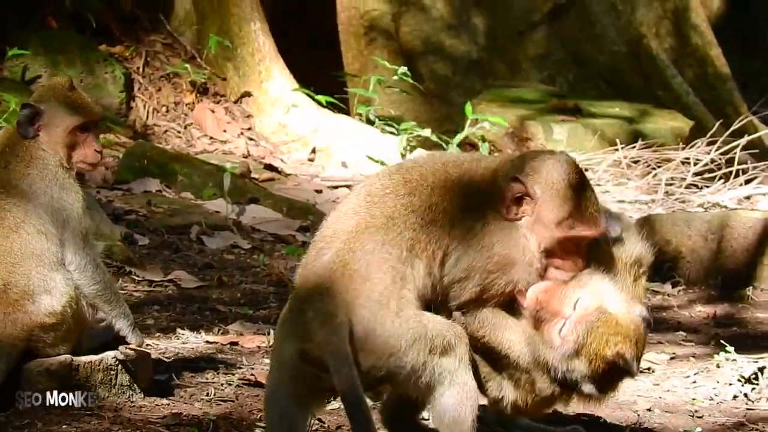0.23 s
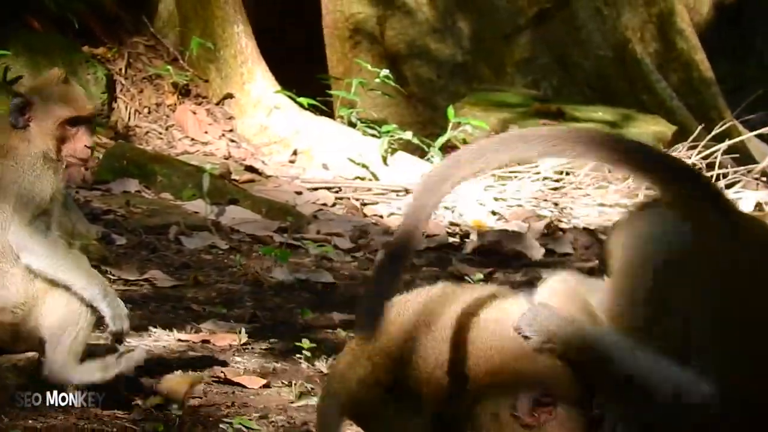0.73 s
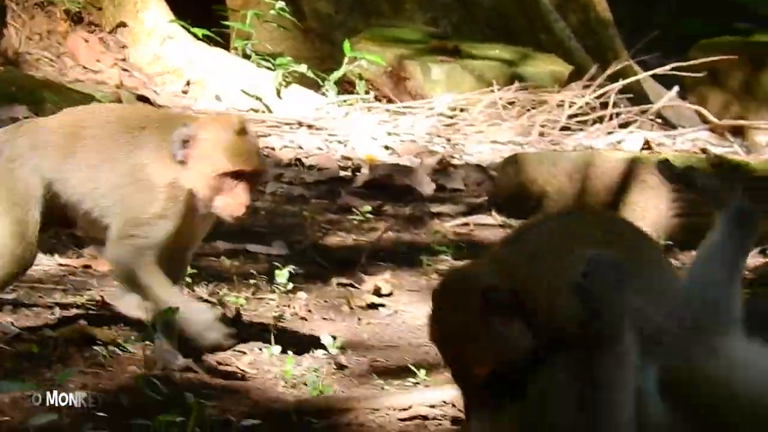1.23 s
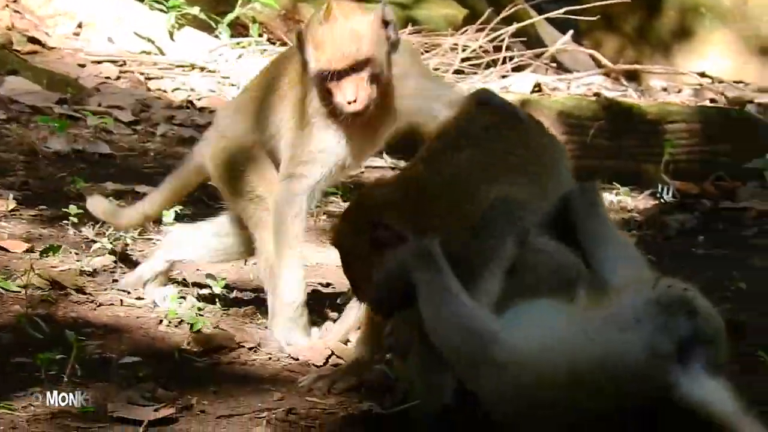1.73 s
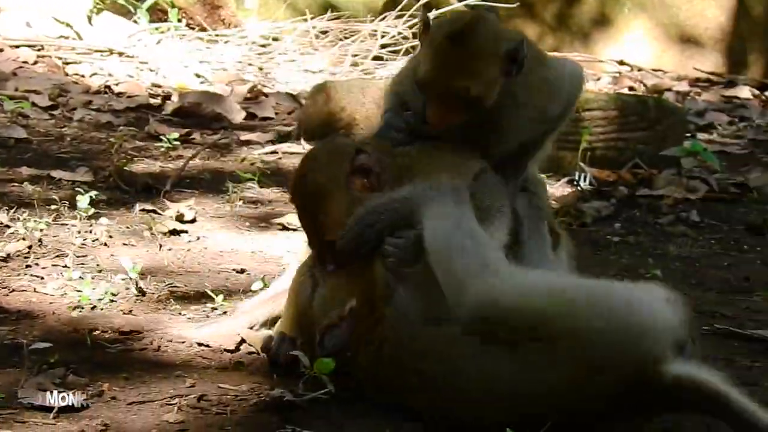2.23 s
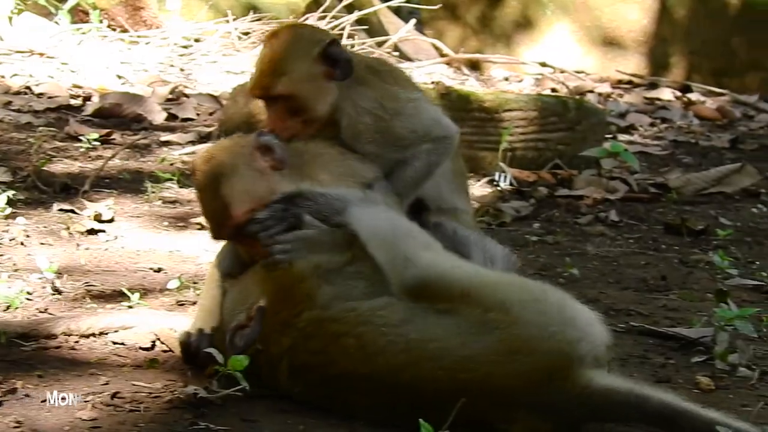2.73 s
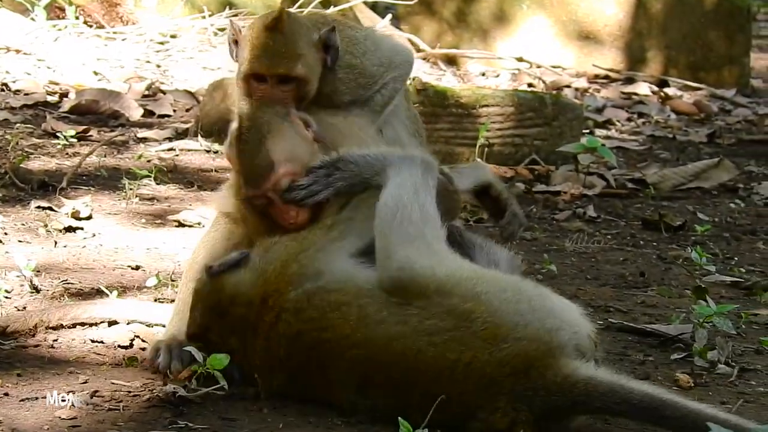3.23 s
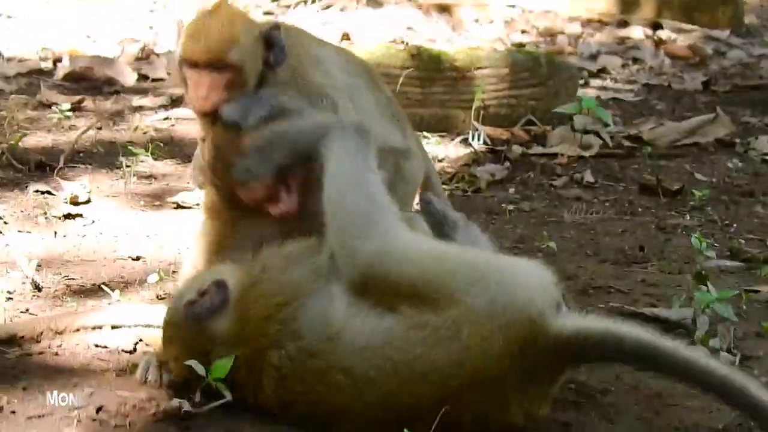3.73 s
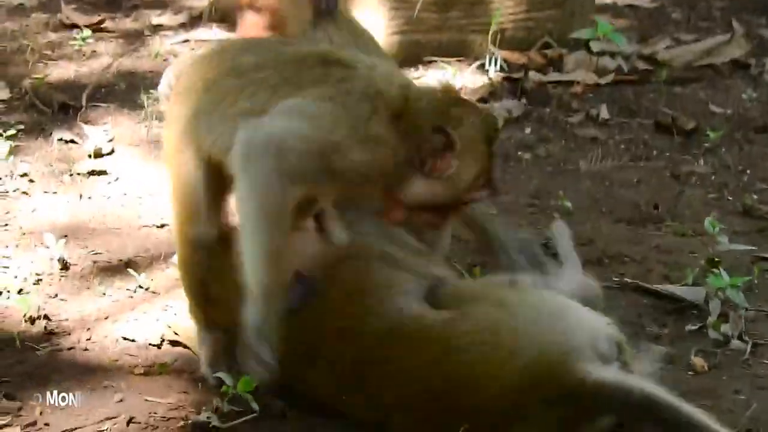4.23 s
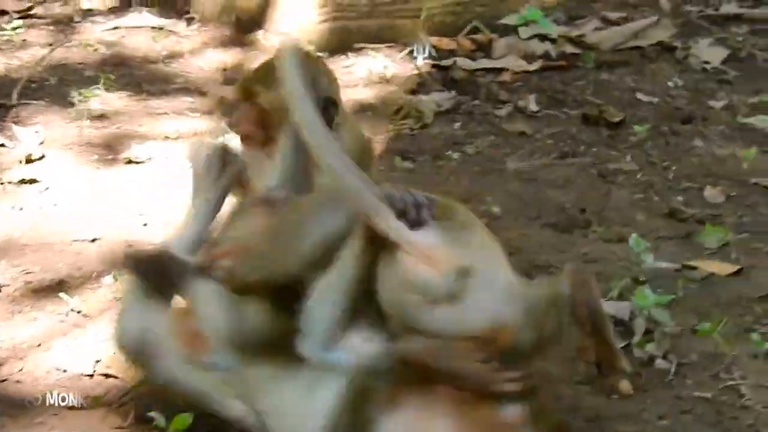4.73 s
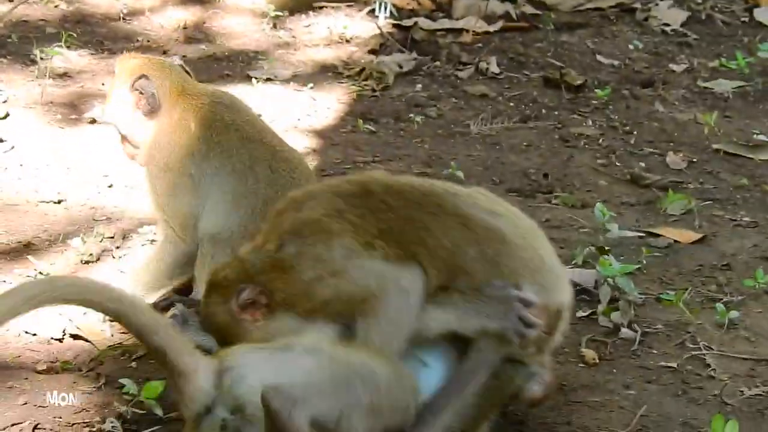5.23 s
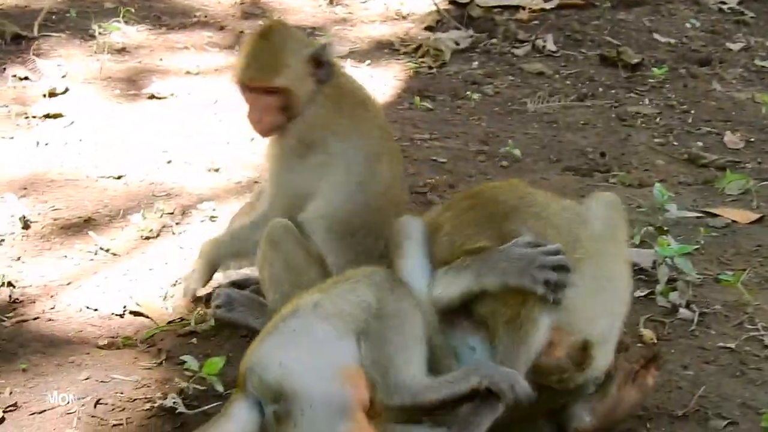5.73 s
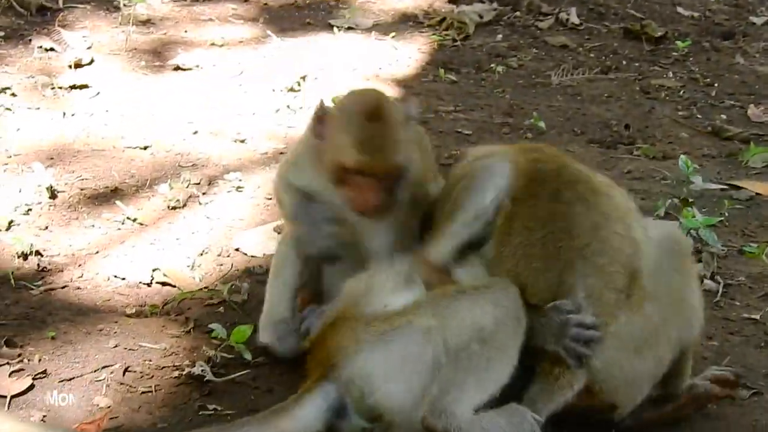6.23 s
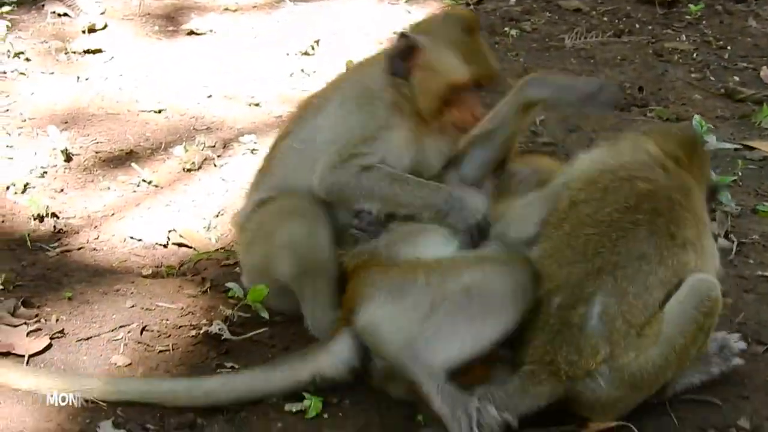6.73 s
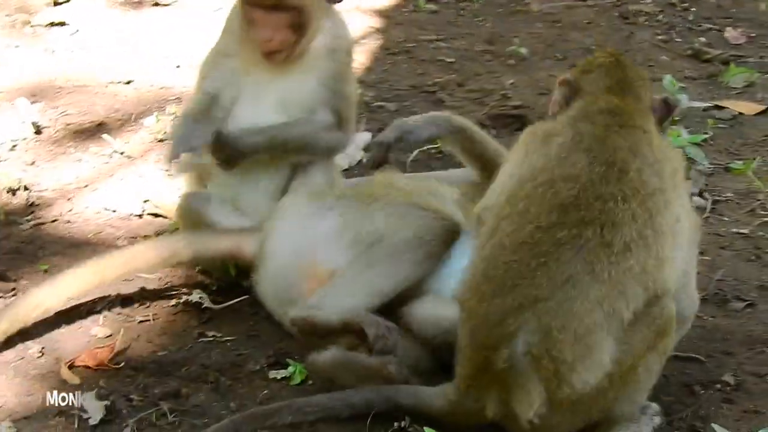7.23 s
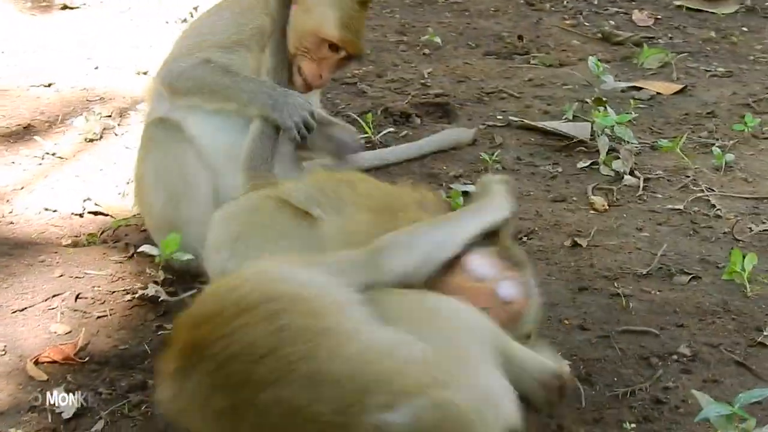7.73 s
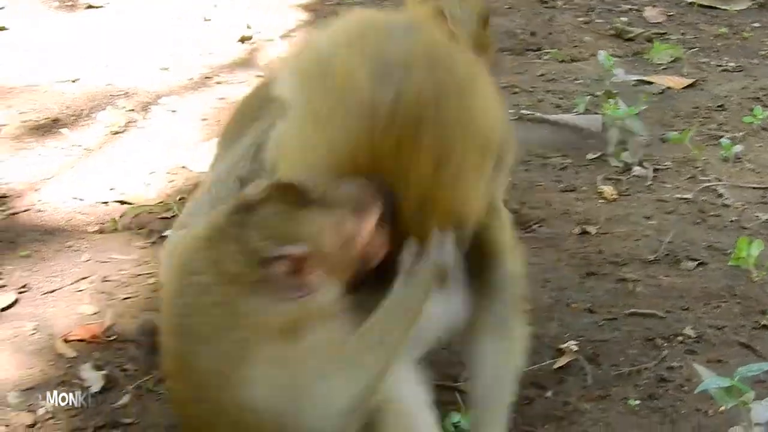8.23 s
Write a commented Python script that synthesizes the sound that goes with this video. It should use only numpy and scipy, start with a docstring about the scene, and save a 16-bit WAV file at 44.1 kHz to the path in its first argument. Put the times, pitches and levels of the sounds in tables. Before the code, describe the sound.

A quiet wood with faint low throb, soft leaf rush and thin insect hiss. Far hooting calls and small birds' rising chirps and whistles come and go. Young monkeys wrestle nearby: sharp twig snaps, brief rustling sweeps over dry litter, soft thuds on earth. The scuffle grows busier, then one monkey shrieks very loudly, a rasp breaking into a falling squeal, followed by a snap and tumble. Open-air stereo microphone, close to the animals, with light echo from the trees.

```python
"""Young macaques wrestle on dry leaves and earth in a wood; near the end one shrieks close by.
Shaped noise makes the snaps, sweeps and thuds. The shriek is a set of harmonics that blur into rasping
bursts, then clear into a falling squeal. Gliding tones make the birds, blurred tones the far calls and
pulsed tones the insects. A faint low throb, far wash, leaf rush and insect hiss run underneath."""
import sys
import numpy as np
from scipy import signal
from scipy.fft import rfft, irfft, next_fast_len
from scipy.io import wavfile
from scipy.ndimage import uniform_filter1d, minimum_filter1d, map_coordinates

SR = 44100
rng = np.random.default_rng(int(sys.argv[2]) if len(sys.argv) > 2 else 0)


def dump(signal):
    """Clip the signal to [-1, 1] and save it as 16-bit WAV at the path in sys.argv[1]."""
    limited = np.clip(np.atleast_2d(signal).T, -1, 1)
    pcm = np.round(limited * 32767).astype(np.int16)
    wavfile.write(sys.argv[1], SR, pcm)


N = 373527  # length in samples

# Levels in the tables are relative: echo, colour and mixing gains come on top. Times are in seconds.

# Low throb. Each row: time in seconds, level in dB.
THROB_LEVEL = [(0.0, -54.5), (0.35, -44.5), (0.47, -64.5), (0.54, -54), (2.0, -57), (2.12, -66.5),
               (2.31, -49), (2.99, -65), (4.43, -59), (5.87, -65), (7.45, -49), (7.74, -57.5), (8.09, -46),
               (8.19, -61.5), (8.38, -35), (8.47, -50)]
# Tone colour of the throb. Each row: frequency in Hz, level in dB per Hz.
THROB_COLOUR = [(25, -41), (100, -2), (130, 3.5), (165, 1), (210, -9), (330, -25.5), (1000, -120)]
# Wavering tones within the throb. Each row: frequency in Hz, level in dB.
HUM_TONES = [(130, -5.5), (159, -5.5)]
THROB_PER_S, THROB_DRIFT = 22, 0.03694  # average beats per second; relative unsteadiness
# The far wood. Each row: time in seconds, level in dB.
FAR_LEVEL = [(0.0, -63), (0.58, -68), (1.42, -62.5), (2.74, -68.5), (4.39, -65.5), (4.77, -61.5),
             (5.15, -66.5), (6.2, -72), (7.58, -71), (8.08, -68.5)]
# Tone colour of the far wood. Each row: frequency in Hz, level in dB per Hz.
FAR_COLOUR = [(200, -16.5), (400, -1.5), (750, -2), (1250, -8.5), (12000, -100)]
# Stirring leaves. Each row: time in seconds, level in dB.
LEAF_LEVEL = [(0.0, -65), (0.4, -70), (1.4, -77.5), (1.58, -63.5), (2.43, -81.5), (2.95, -78.5),
              (3.26, -64.5), (4.23, -69.5), (4.859, -73), (5.65, -59), (6.1, -76.5), (6.41, -67.5),
              (6.75, -74), (7.34, -71), (8.08, -56.5)]
# Tone colour of the stirring leaves. Each row: frequency in Hz, level in dB per Hz.
LEAF_COLOUR = [(700, -29), (1700, 3), (2800, 3), (7000, -14.5), (13000, -43.5)]
# Tone colour of the insect hiss. Each row: frequency in Hz, level in dB per Hz.
HISS_COLOUR = [(1500, -32), (4500, 0), (6000, 4.5), (7000, 12), (8000, 0), (9500, -13), (11200, -9.5),
               (14000, -36.5)]
PATCHY_DB = 5.5  # depth of the patches that swell and fade in every rushing noise

# How long the trees echo. Each row: frequency in Hz, time to fade by 60 dB in seconds.
TREE_ECHO = [(800, 0.51), (3000, 0.74), (12000, 0.59)]

# Far hooting calls. Each row: start in seconds, length in seconds, pitch in Hz, level in dB.
FAR_HOOTS = [(0, 0.079, 708.6, -54), (0.794, 0.11, 460, -49.5), (.98, 0.1, 460, -49.5),
             (1.074, .15, 658, -55), (1.21, 0.093, 822, -50.5), (1.35, 0.13, 828, -51.5),
             (1.362, 0.422, 636, -60), (1.54, 0.1, 860, -53.5), (1.706, 0.19, 853, -55.5),
             (2.197, 0.11, 1112, -60), (2.35, 0.094, 1070, -61), (3.49, 0.157, 433.4, -61),
             (4.331, 0.035, 710, -54), (4.525, 0.096, 708.5, -49), (4.767, 0.03, 699, -51.5),
             (4.827, 0.037, 702, -55), (4.89, 0.06, 702.4, -50.5), (4.99, 0.04, 683, -53),
             (5.33, 0.042, 710, -61), (5.421, 0.25, 361.7, -63), (5.938, 0.27, 432.5, -67.5),
             (6.534, 0.15, 354, -64)]
HOOT_WAVER = 0.012  # relative pitch wobble
# Sets the pitch around which a call is mostly hoarse; blur speed as a share of the pitch.
HOOT_HOARSE_HZ, HOOT_BLUR = 1100, .25

# Twigs and dry leaves snap. Each row: start in seconds, peak in dB, pitch in Hz, spread in octaves.
TWIG_SNAPS = [(0.027, -37, 6110, 0.66), (.595, -27.5, 2430, 0.17), (0.604, -32, 6900, 0.65),
              (1.389, -33, 3270, 0.41), (1.399, -35.5, 4120, 0.264), (1.551, -41.5, 4500, 0.54),
              (1.809, -44.5, 6160, 0.18), (2.061, -45.5, 3280, 0.09), (2.756, -47.5, 5770, 0.34),
              (3.876, -36, 4970, 1.23), (4.122, -33, 1620, 1.76), (4.124, -37.5, 690, 0.42),
              (4.43, -32.5, 2800, 0.45), (4.44, -29.5, 4270, 1.1), (4.579, -28.5, 1830, 1.115),
              (4.587, -31, 5370, 0.56), (4.714, -26.5, 2260, 1.11), (4.723, -21, 5566, 0.46),
              (7.683, -27, 6260, 0.15), (8.454, -24, 1460, 0.7), (8.463, -18, 5530, 0.56)]
# Bodies sweep over the litter. Each row: start in seconds, length in seconds,
# level of the crisp leaves in dB, level of the duller rub in dB.
BODY_SWEEPS = [(1.543, 0.1, -79, -67), (3.417, 0.47, -62.5, -82), (4.093, 0.24, -57, -68.5),
               (4.552, 0.38, -56, -70), (5.584, 0.29, -69, -65), (5.72, 0.2, -89.5, -59.5),
               (6.16, 0.27, -70, -56.5), (6.451, 0.33, -57.5, -58.5), (6.86, 0.79, -60, -69.5),
               (7.662, 0.13, -53.5, -44.5), (7.701, 0.058, -42.5, -64.5), (7.92, 0.26, -58.5, -59)]
# Tone colour of the crisp leaves. Each row: frequency in Hz, level in dB per Hz.
LITTER_COLOUR = [(300, -39), (2500, -3.5), (6000, 9.5), (7500, 5), (10000, -8), (12000, -35)]
# Tone colour of the duller rub. Each row: frequency in Hz, level in dB per Hz.
RUB_COLOUR = [(900, -45), (1800, -1), (2600, 2.5), (5000, -11.5), (12000, -43)]
# Fur brushes over fine grit. Each row: start in seconds, length in seconds, level in dB.
FUR_BRUSHES = [(7.455, 0.26, -54.5), (7.825, 0.17, -56.5)]
# Tone colour of the grit. Each row: frequency in Hz, level in dB per Hz.
GRIT_COLOUR = [(3000, -45), (6000, -3), (8000, 5), (10000, -5.5), (12000, -37.5)]
# The last tumble. Each row: start in seconds, length in seconds, level in dB.
LAST_TUMBLE = [(8.28, 0.475, -43)]
# Tone colour of the tumble on earth. Each row: frequency in Hz, level in dB per Hz.
EARTH_COLOUR = [(40, -42), (130, -8), (290, -11), (520, 0), (950, -2), (8000, -90)]

# Insect trills. Each row: start in seconds, length in seconds, pitch in Hz, pulses per second, level in dB.
INSECT_TRILLS = [(0.236, 0.24, 7780, 85, -63), (0.558, 0.144, 7750, 49, -63.5),
                 (2.513, 0.27, 7860, 77, -62.5), (2.596, 0.83, 8552, 86, -71)]

# A bird's upward "sweet". Each row: time at its top in seconds, length in seconds, level in dB.
SWEET_NOTES = [(.625, 0.094, -34), (1.402, 0.1, -35), (3.172, 0.13, -36), (5.487, 0.108, -30),
               (6.635, 0.11, -32)]
# Shape of the "sweet". Each row: share of its length, pitch in Hz, level in dB.
SWEET_SHAPE = [(0, 3956, -25), (.2, 4400, -11), (0.72, 5770, -0.5), (0.95, 6420, -4), (1.05, 6840, -30)]
# A lower bird's arched note. Each row: time at its end in seconds, length in seconds, level in dB.
ARCHED_NOTES = [(.41, 0.15, -45.5), (3.465, 0.13, -43), (4.043, .125, -44.5)]
# Shape of the arched note. Each row: share of its length, pitch in Hz, level in dB.
ARCH_SHAPE = [(0, 1420, -13), (.33, 1520, -8), (.43, 1910, -3), (.52, 1930, 0), (.62, 1800, 0),
              (.77, 1540, -9), (1, 1450, -12)]
ARCH_ECHO_S, ARCH_ECHO_DB = 0.06, -7.5  # a far row of trees throws the arched note back
# Held whistles slide onto their note. Each row: start in seconds, length in seconds, first pitch in Hz,
# held pitch in Hz, slide time in seconds, level in dB.
HELD_WHISTLES = [(0.91, 0.397, 3867, 2972, 0.0892, -44.5), (1.314, 0.092, 3050, 2976, 0.042, -53.5),
                 (4.516, 0.2, 6140, 4170, 0.059, -56.5), (4.599, 0.15, 3206, 3790, 0.074, -55.5),
                 (4.794, 0.12, 4190, 3836, 0.033, -52), (4.839, 0.31, 6570, 6860, .06, -61.5),
                 (6.861, 0.17, 4300, 3740, 0.01484, -50), (7.101, 0.087, 3644, 4033, 0.0282, -46)]
WHISTLE_EDGE_DB, WHISTLE_WAVER = 9, 0.014  # how much softer the ends are; relative pitch wobble
BREATHY_PER_OCTAVE = .14  # extra pitch wobble per octave away from the held note
# Quick slurs. Each row: start in seconds, length in seconds, first pitch in Hz, last pitch in Hz, level in dB.
QUICK_SLURS = [(1.244, 0.097, 2880, 2184, -56.5), (1.599, 0.044, 2100, 2717, -63.5),
               (3.173, 0.12, 2800, 2165, -65), (5.006, 0.073, 4170, 2394, -51),
               (5.218, 0.054, 3460, 2343, -54), (6.083, 0.063, 2170, 2886, -59),
               (7.283, 0.0819, 3916, 2195, -48), (7.439, 0.077, 3150, 2263, -50)]
SLUR_EDGE_DB, SLUR_WAVER = -3.5, 0.02436  # negative: stronger towards the ends; relative pitch wobble

# Bodies thud softly on the ground. Each row: start in seconds, length in seconds, level in dB.
BODY_THUDS = [(2.33, 0.065, -50.5), (3.37, 0.14, -54), (3.71, 0.0566, -48.5), (4.11, 0.051, -61),
              (5.58, 0.13, -55.5), (6.765, 0.06, -45.5)]
# Tone colour of a thud. Each row: frequency in Hz, level in dB per Hz.
THUD_COLOUR = [(30, -30), (80, -2), (130, 10), (190, -6), (330, -20), (1000, -90)]

# A far, level, reedy call: start in seconds, length in seconds, pitch in Hz, level in dB.
REEDY_CALL = (6.32, .26, 1570, -58)
# Harmonics of the reedy call. Each row: multiple of its pitch, level in dB.
REEDY_HARMONICS = [(1, 0), (2, -7), (3, 0)]
REEDY_SWELL_DB = 7  # growth while it is held

# A very high, faint whistle: start in seconds, length in seconds, lowest pitch in Hz, top pitch in Hz,
# level in dB.
HIGH_WHISTLE = (6.39, .35, 12900, 14100, -77)

# The shriek's voice rasps, locks into a falling squeal and cracks once on the way down.
# Each row: time in seconds, pitch in Hz, roughness from 0 to 1.
SHRIEK_VOICE = [(8.103, 3950, 0), (8.11, 3900, .2), (8.114, 2650, 1), (8.14, 2650, 1), (8.153, 2550, .7),
                (8.172, 2650, .85), (8.187, 2700, 1), (8.205, 3200, 1), (8.228, 3200, 1),
                (8.235, 3620, .15), (8.25, 3300, .05), (8.259, 2950, .08), (8.266, 2800, .2),
                (8.27, 2400, .9), (8.277, 2450, .9), (8.281, 2500, .25), (8.292, 2120, .05),
                (8.325, 1980, .05)]
# Its effort in rasping bursts. Each row: time in seconds, fundamental in dB, overtones in dB.
RASP_EFFORT = [(8.103, -48, -60), (8.113, -24, -37), (8.122, -17, -38), (8.127, -30, -37),
               (8.139, -30, -34), (8.145, -17, -25), (8.153, -11, -24), (8.163, -14, -28),
               (8.171, -15, -18), (8.179, -19, -17), (8.187, -14, -24), (8.193, -24, -26),
               (8.202, -20, -13), (8.213, -19, -16), (8.222, -26, -24), (8.23, -23, -18)]
# Its effort through the squeal. Each row: time in seconds, fundamental in dB, overtones in dB.
SQUEAL_EFFORT = [(8.237, -11, -27), (8.248, -8, -23), (8.253, -12, -15), (8.264, -8, -25),
                 (8.268, -20, -27), (8.274, -16, -27), (8.283, -12, -16), (8.293, -17, -24),
                 (8.317, -15, -16), (8.325, -22, -16)]
# From the crack on, a lower second tone mixes with the voice. Each row: time in seconds, pitch in Hz,
# level in dB, level of their sum tone in dB.
SECOND_TONE = [(8.267, 1600, -24, -30), (8.271, 1560, -16, -20), (8.279, 1520, -8, -20),
               (8.284, 1250, -16, -15), (8.288, 1170, -21, -9), (8.293, 1100, -25, -26),
               (8.315, 1010, -14, -32), (8.324, 980, -22, -40)]
# Colour that the throat gives. Each row: frequency in Hz, gain in dB.
THROAT_COLOUR = [(700, -37), (1150, -20), (1550, -7.5), (3400, -0.5), (6500, 3.5), (7700, -2.5),
                 (9000, -14), (11000, -26), (15000, -53)]
# Extra colour while the throat is narrowed. Each row: frequency in Hz, gain in dB.
PINCH_COLOUR = [(2900, 1), (3600, -4), (5700, -5), (6200, 4), (7000, -4)]
# When the throat narrows and opens again: two times in seconds.
PINCH_TIMES = (8.126, 8.175)
VOICE_DB, RASP_DB = 0.5, 7  # gain of the whole source; extra gain of its breathy noise
SMEAR_HZ, RELEASE_S = 949, 0.0035  # speed of blurring, times harmonic number; final fade in seconds
FLUTTER_DB = 1.8  # quick unsteadiness in level
RATTLE_PER_S, RATTLE_DB = 300, 2.8  # average rate of uneven pulses; depth at full roughness
RASP_LOW_HZ = 1330  # the breathy noise fades out below this
RASP_SPLIT_HZ = 3760  # the noise follows the fundamental below this, the overtones above it
LAG_HZ, LAG_S = 3950, .0105  # the treble above this frequency arrives this much later

CEILING, LOOK_AHEAD_S = .9, .002  # limiter: highest sample value, look-ahead
TOP_HZ = 15700  # nothing is kept from here up


def amp(db):
    """Turn decibels into a plain multiplier."""
    return 10 ** (np.asarray(db) / 20)


def unit(x):
    """Scale to an average strength (rms) of 1."""
    return x / np.sqrt(np.mean(np.abs(x) ** 2) + 1e-20)


def along(points, hz):
    """Read (Hz, value) points on a log frequency axis."""
    f, v = np.transpose(points)
    return np.interp(np.log(hz + 1), np.log(f + 1), v)


def curves(rows, t):
    """Read each column after the time column, at times t."""
    s, *columns = np.transpose(rows)
    return [np.interp(t, np.sort(s), column) for column in columns]


def times(start, end):
    """List the sample times from start to end, at least 64 of them."""
    return start + np.arange(max(int((end - start) * SR), 64)) / SR


def add(track, s, x):
    """Mix x into the track at s seconds."""
    i = max(round(s * SR), 0)
    track[i:i + len(x)] += x[:max(len(track) - i, 0)]


def delayed(x, s):
    """Play x s seconds later."""
    return np.pad(x, (round(s * SR), 0))[:len(x)]


def wobble(rate, size):
    """Draw a smooth random curve through rate random points a second."""
    points = rng.standard_normal(int(size * rate / SR) + 4)
    return map_coordinates(points, [np.arange(size) * rate / SR])


def phase(hz):
    """Add up a changing frequency into the angle of a wave."""
    return 2 * np.pi * np.cumsum(hz) / SR


def filtered(x, response):
    """Multiply each frequency of x by response(hz)."""
    size = x.shape[-1]
    m = next_fast_len(size + 8192)
    return irfft(rfft(x, m) * response(np.fft.rfftfreq(m, 1 / SR)), m)[..., :size]


def coloured(x, spectrum):
    """Give x a tone colour and an rms of 1."""
    return unit(filtered(x, lambda hz: amp(along(spectrum, hz))))


def spread(mid, side, width, left_db):
    """Share a sound between left and right, with side as their difference and left_db as the lean."""
    return np.array([mid + width * side, mid - width * side]) * amp([[left_db / 2], [-left_db / 2]])


def rush(spectrum, grain_db, left_db):
    """Make stereo noise clumped into grains, with patches that swell and fade."""
    clumps = amp(grain_db * (wobble(600, N) + 1.48 * wobble(30, N)))
    z = signal.stft(rng.standard_normal((2, N)) * clumps, nperseg=2048)[2]
    patches = uniform_filter1d(rng.standard_normal(z.shape[1:]), size=4, axis=0)  # over frequency
    patches = uniform_filter1d(patches, size=7, axis=1)  # over time
    pair = signal.istft(z * amp(PATCHY_DB * unit(patches)), nperseg=2048)[1][:, :N]
    return spread(*coloured(pair, spectrum), 0.52, left_db)


def wood(x, direct_db, echo_db, left_db):
    """Join the direct sound and its scatter from trunks and leaves, made from fading noise."""
    hz, t, z = signal.stft(rng.standard_normal((2, SR)), SR, nperseg=256)
    early = 1 + 1.0 * np.exp(-t / 0.012)  # the nearest trunks answer hardest
    fade = amp(-60 * t / along(TREE_ECHO, hz)[:, None])
    tail = signal.istft(z * early * fade, SR, nperseg=256)[1]
    tail = np.pad(tail / np.linalg.norm(tail[0]), ((0, 0), (SR // 300, 0)))
    mid, side = amp(echo_db) * signal.fftconvolve(x[None], tail, axes=1)[:, :N]
    return spread(amp(direct_db) * x + mid, side, 0.472, left_db)


def whistle(rows, waver, overtone_db=-48):
    """Make a nearly pure tone that follows (s, Hz, dB) rows, with a faint octave above."""
    t = times(rows[0][0], rows[-1][0])
    hz, db = curves(rows, t)
    turn = phase(hz * (1 + waver * wobble(213.5, len(t))))
    octave = amp(overtone_db) * (hz < SR / 4) * np.sin(2 * turn)
    envelope = amp(db) * signal.windows.tukey(len(t), .08)
    return np.sqrt(2) * envelope * (np.sin(turn) + octave)


def strokes_of(rows, skew):
    """Make an envelope of rounded, uneven swells; a skew below 1 peaks early."""
    out = np.zeros(N)
    for s, length, db in rows:
        u = np.linspace(0, 1, len(times(0, length)))
        add(out, s, amp(db) * np.abs(np.sin(np.pi * u ** skew)))
    return out * amp(1.3 * wobble(25, N))


def low_throb():
    """Uneven clicks and noise, filtered down low, beat under a wavering hum."""
    rate = THROB_PER_S * (1 + THROB_DRIFT * wobble(21, N))
    beats = np.diff(np.floor(np.cumsum(rate) / SR), prepend=0)
    pulses = unit(beats * amp(2.6 * wobble(40, N))) + 0.72 * rng.standard_normal(N)
    pulses = pulses * amp(3.4 * wobble(11, N))
    hum = np.zeros(N)
    for hz, db in HUM_TONES:
        hum += amp(db + 6.6 * wobble(3.9, N)) * np.sin(phase(hz * (1 + 0.0158 * wobble(16, N))))
    side = coloured(rng.standard_normal(N), THROB_COLOUR)
    return spread(coloured(pulses, THROB_COLOUR) + hum, side, 0.17, left_db=6.5)


def background():
    """The throb joins three shaped noises: far wood, stirring leaves and an insect hiss."""
    t = np.arange(N) / SR
    throb_db, far_db, leaves_db = (curves(rows, t)[0] for rows in (THROB_LEVEL, FAR_LEVEL, LEAF_LEVEL))
    throb = amp(throb_db - 3.0) * low_throb()
    far = amp(far_db + 2.0) * rush(FAR_COLOUR, grain_db=2, left_db=3.0)
    leaves = amp(leaves_db + 2) * rush(LEAF_COLOUR, grain_db=1.5, left_db=3.0)
    hiss = amp(-72.5) * rush(HISS_COLOUR, grain_db=2, left_db=2.0)
    return throb + far + leaves + hiss


def hoots():
    """Far calls swell and fade, the higher the hoarser, and arrive blurred by echo."""
    out = np.zeros(N)
    for s, length, hz, db in FAR_HOOTS:
        size = len(times(0, length))
        hoarse = min(.08 + (hz / HOOT_HOARSE_HZ) ** 7, .8)
        blur = unit(wobble(HOOT_BLUR * hz, size) + 1j * wobble(HOOT_BLUR * hz, size))
        tone = np.exp(1j * phase(hz * (1 + HOOT_WAVER * wobble(HOOT_BLUR * hz, size))))
        call = np.real(tone * (np.sqrt(1 - hoarse) + np.sqrt(hoarse) * blur))
        add(out, s, amp(db) * unit(call * np.sin(np.linspace(0, np.pi, size))))
    return wood(out, direct_db=-3, echo_db=-2.5, left_db=2.5)


def snaps():
    """A breaking twig or leaf gives a sharp noise burst around its own pitch, with a weaker tail."""
    out, t = np.zeros(N), times(0, 0.057)
    lead = 1 / 500  # seconds of room before the burst for the filter
    for s, db, hz, octaves in TWIG_SNAPS:
        decay = amp(-60 * t / 0.018) + 0.17 * amp(-60 * t / 0.15)
        crack = rng.standard_normal(len(t)) * decay * amp(3.5 * wobble(600, len(t)))

        def response(f):
            """Pass a band around the pitch and dull the top."""
            band = (1 + (np.log2((f + 1) / hz) / octaves) ** 4) ** -1.5
            return band / (1 + (f / 10500) ** 8)

        crack = filtered(np.pad(crack, (SR // 500, 0)), response)
        add(out, s - lead, amp(db) * crack / np.abs(crack).max())
    return wood(out, direct_db=-2.5, echo_db=-16.5, left_db=5.0)


def crinkle(rate, spread_db):
    """Tiny leaf edges break at random moments, a few louder than the rest."""
    breaks = (rng.random(N) < rate / SR) * rng.choice([-1, 1], N)
    strength = amp(spread_db * np.minimum(rng.exponential(size=N), 3))
    return coloured(breaks * strength, LITTER_COLOUR)


def sweeps():
    """Bodies rub over crisp and dull litter, and fur over grit: swells of shaped noise."""
    leaves = rush(LITTER_COLOUR, grain_db=2.0, left_db=1.5) + 0.056 * crinkle(rate=390, spread_db=1.0)
    rows = np.array(BODY_SWEEPS)
    crisp = strokes_of(rows[:, [0, 1, 2]], skew=0.49)
    dull = strokes_of(rows[:, [0, 1, 3]], skew=0.49)
    litter = crisp * leaves + dull * rush(RUB_COLOUR, grain_db=0, left_db=1.5)
    return litter + strokes_of(FUR_BRUSHES, skew=0.38) * rush(GRIT_COLOUR, grain_db=0.5, left_db=-1)


def tumble():
    """A body rolls on the earth: one swell of dull, lumpy noise."""
    return strokes_of(LAST_TUMBLE, skew=0.86) * rush(EARTH_COLOUR, grain_db=4, left_db=3.5)


def scuffle():
    """The wrestling is snaps, sweeps over dry litter and a dull tumble together."""
    return snaps() + sweeps() + tumble()


def insects():
    """Each wing stroke rings one high resonance: a high tone is pulsed at the stroke rate."""
    out = np.zeros(N)
    for s, length, hz, rate, db in INSECT_TRILLS:
        tone = whistle([(s, hz, db), (s + length, hz * 1.02, db)], waver=0.0092)
        beat = phase(rate * (1 + 0.059 * wobble(21.4, len(tone))))
        strokes = unit((1 + np.sin(beat)) ** 2)
        add(out, s, tone * strokes * amp(0.72 * wobble(59, len(tone))))
    return wood(out, direct_db=-2, echo_db=-13, left_db=0)


def repeated(calls, shape):
    """One bird repeats its note at different lengths and strengths."""
    out = np.zeros(N)
    for end, length, level in calls:
        rows = [(end + (u - 1) * length, hz, level + db) for u, hz, db in shape]
        add(out, rows[0][0], whistle(rows, waver=0.0036))
    return out


def swell(size, edge_db):
    """Make a note's ends softer than its middle by edge_db, or stronger if that is negative."""
    return amp(-edge_db * np.linspace(-1, 1, size) ** 2)


def long_notes():
    """Held whistles settle onto one pitch and slurs sweep straight through; the trees make both flutter."""
    out = np.zeros(N)
    for s, length, first, held, slide, db in HELD_WHISTLES:
        t = times(0, length)
        hz = held + (first - held) * np.exp(-t / slide)
        # breathy while away from the held pitch
        hz = hz * (1 + BREATHY_PER_OCTAVE * np.log2(hz / held) * wobble(600, len(t)))
        rows = np.column_stack([s + t, hz, np.full(len(t), db)])
        note = whistle(rows, waver=WHISTLE_WAVER, overtone_db=-32.0)
        add(out, s, note * swell(len(note), WHISTLE_EDGE_DB))
    for s, length, first, last, db in QUICK_SLURS:
        note = whistle([(s, first, db), (s + length, last, db)], waver=SLUR_WAVER, overtone_db=-22.0)
        add(out, s, note * swell(len(note), SLUR_EDGE_DB))
    return out * amp(1.85 * wobble(88, N))


def birds():
    """Two birds repeat gliding notes; quavering whistles come from deeper in the trees."""
    flicker = amp(3.2 * wobble(70, N))  # leaves break up the path
    sweets = repeated(SWEET_NOTES, SWEET_SHAPE) * flicker
    arches = repeated(ARCHED_NOTES, ARCH_SHAPE)
    thrown_back = amp(ARCH_ECHO_DB) * delayed(arches, ARCH_ECHO_S)
    return (wood(sweets, direct_db=-11.5, echo_db=-9.0, left_db=3)
            + wood(arches, direct_db=-3.5, echo_db=-5, left_db=1)
            + wood(thrown_back, direct_db=-6, echo_db=-1, left_db=-1.5)
            + wood(long_notes(), direct_db=-7.5, echo_db=0.0, left_db=1.0))


def thuds():
    """Soft bodies on packed earth give one dull push each."""
    return strokes_of(BODY_THUDS, skew=0.69) * rush(THUD_COLOUR, grain_db=3.0, left_db=8.5)


def reedy_call():
    """One reedy note, built from harmonics, is held far away and grows."""
    s, length, hz, db = REEDY_CALL
    out = np.zeros(N)
    for k, level in REEDY_HARMONICS:
        rows = [(s, k * hz, db + level - REEDY_SWELL_DB), (s + length, k * hz, db + level)]
        add(out, s, whistle(rows, waver=0.0039))
    return wood(out, direct_db=-4, echo_db=-5, left_db=6.5)


def thin_call():
    """A very high, faint whistle rises and falls in one arch."""
    s, length, low, top, db = HIGH_WHISTLE
    out, u = np.zeros(N), np.linspace(0, 1, len(times(0, length)))
    hz = low + (top - low) * np.sin(np.pi * u ** .7)
    add(out, s, whistle(np.column_stack([s + length * u, hz, np.full(len(u), db)]), waver=.003))
    return out


def shriek_tones(t, hz, rough, base, overtones):
    """Four harmonics blur when the voice is rough; later a second tone mixes with them."""
    size = len(t)
    turn = phase(hz * (1 + (0.004 + 0.03 * rough) * wobble(700, size)))
    voice = np.zeros(size)
    gains = [base, overtones, overtones * amp(-13.5), overtones * amp(-15)]
    for k, gain in enumerate(gains, 1):
        # chaos smears each harmonic into a band
        chaos = unit(wobble(k * SMEAR_HZ, size) + 1j * wobble(k * SMEAR_HZ, size))
        swing = np.sqrt(1 - rough ** 2) + rough * chaos
        voice += gain * np.real(swing * np.exp(1j * k * turn))
    under_hz, under_db, sum_db = curves(SECOND_TONE, t)
    under = phase(under_hz * (1 + .015 * wobble(700, size)))
    second = amp(under_db) * np.sin(under) + amp(sum_db) * np.sin(turn + under)
    sounding = t > SECOND_TONE[0][0]
    return voice + sounding * second * (1 + .5 * rough * wobble(SMEAR_HZ, size))


def shriek_breath(rough, base, overtones):
    """Rough voice adds breathy noise in two bands, one for each part of the effort."""
    size = len(rough)
    noise = rng.standard_normal(size)
    low = filtered(noise, lambda f: 1 / (1 + (f / RASP_SPLIT_HZ) ** 10))
    low_band = filtered(low, lambda f: 1 - 1 / (1 + (f / RASP_LOW_HZ) ** 10))
    bands = base * low_band + overtones * (noise - low)
    return amp(RASP_DB) * rough * bands * amp(1.3 * wobble(489, size))


def shriek():
    """Chaotic rasping bursts lock into a falling squeal that splits into two tones, shaped by the throat."""
    t = times(SHRIEK_VOICE[0][0], SHRIEK_VOICE[-1][0])
    size = len(t)
    hz, rough = curves(SHRIEK_VOICE, t)
    rough = np.clip(rough, 0, 1)
    base, overtones = amp(curves(list(RASP_EFFORT) + list(SQUEAL_EFFORT), t))
    voice = shriek_tones(t, hz, rough, base, overtones)
    rasp = shriek_breath(rough, base, overtones)
    release = np.minimum((t[-1] - t) / RELEASE_S, 1)
    effort = amp(VOICE_DB + FLUTTER_DB * wobble(298.0, size)) * release
    pulse = np.sin(phase(RATTLE_PER_S * (1 + .5 * wobble(RATTLE_PER_S, size))))
    rattle = unit(amp(RATTLE_DB * rough * pulse))
    source = effort * rattle * (voice + rasp)
    narrow, wide = PINCH_TIMES
    pinched = uniform_filter1d(1.0 * ((t > narrow) & (t < wide)), size=256)
    source += pinched * (filtered(source, lambda f: amp(along(PINCH_COLOUR, f))) - source)
    out = np.zeros(N)
    add(out, t[0], filtered(source, lambda f: amp(along(THROAT_COLOUR, f))))
    treble = filtered(out, lambda f: 1 - 1 / (1 + (f / LAG_HZ) ** 40))
    return wood(out - treble + delayed(treble, LAG_S), direct_db=1.5, echo_db=-9, left_db=2.7)


def scene():
    """Add up every sound in the wood."""
    return (background() + hoots() + scuffle() + insects() + birds() + thuds()
            + reedy_call() + thin_call() + shriek())


def record(dry):
    """A fast limiter holds down the very highest peaks, then everything from TOP_HZ up is removed."""
    size = int(LOOK_AHEAD_S * SR)
    needed = CEILING / np.maximum(np.abs(dry).max(axis=0), CEILING)
    gain = uniform_filter1d(minimum_filter1d(needed, size=2 * size), size=size)
    return filtered(dry * gain, lambda hz: hz < TOP_HZ)


dry = scene()
out = record(dry)
dump(out)
```